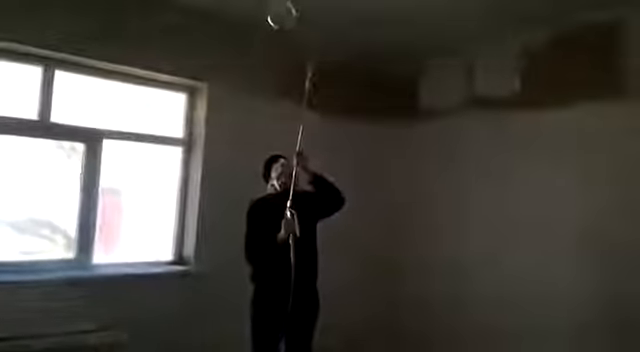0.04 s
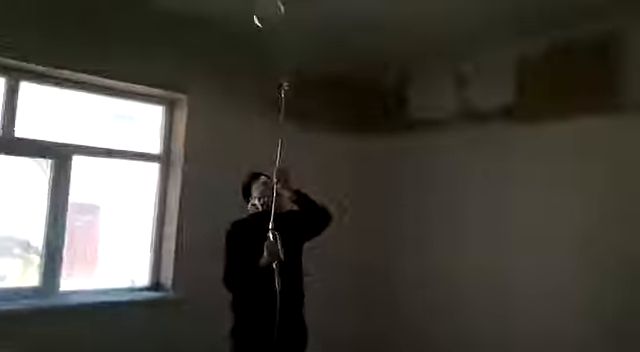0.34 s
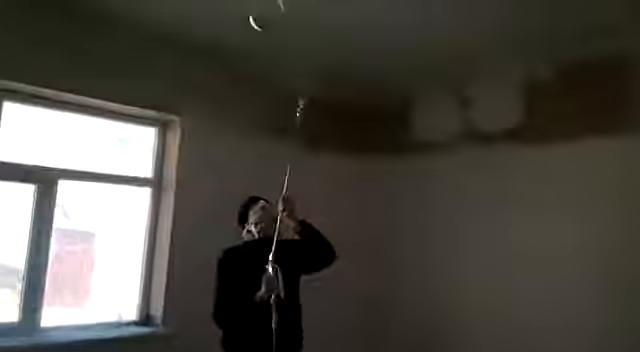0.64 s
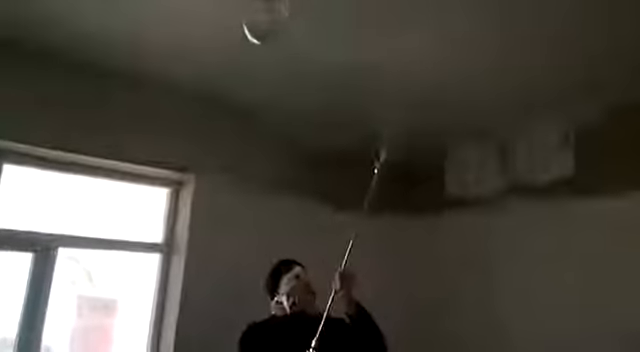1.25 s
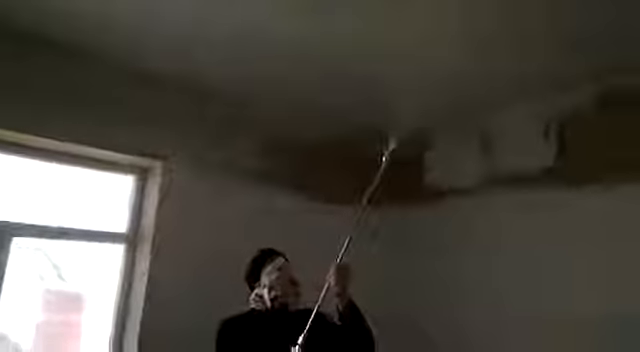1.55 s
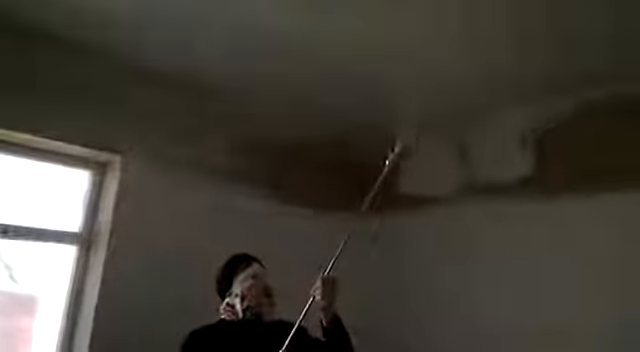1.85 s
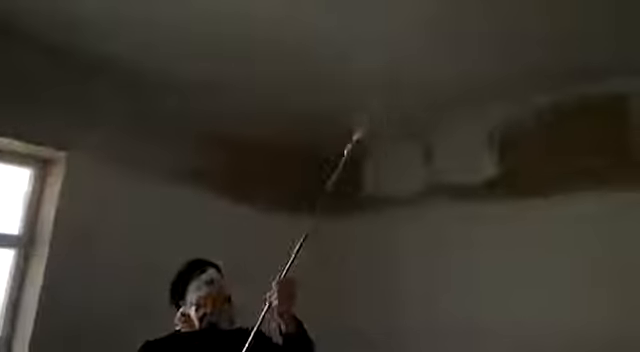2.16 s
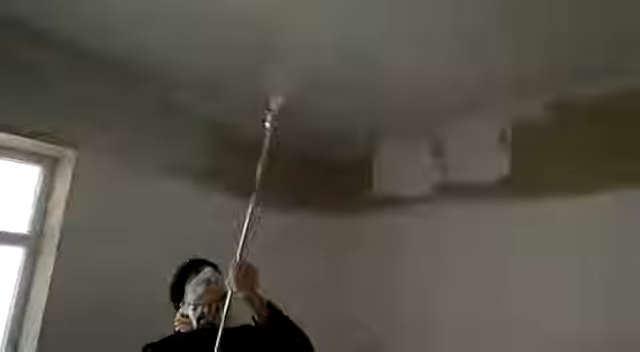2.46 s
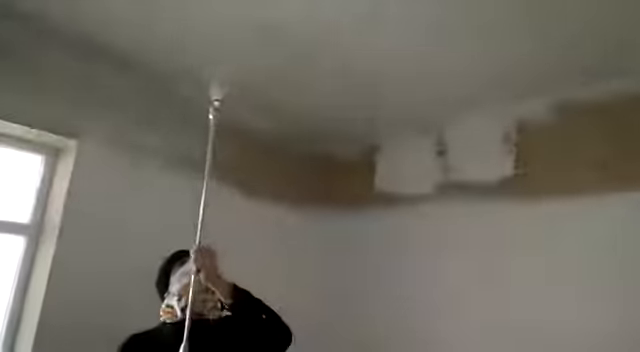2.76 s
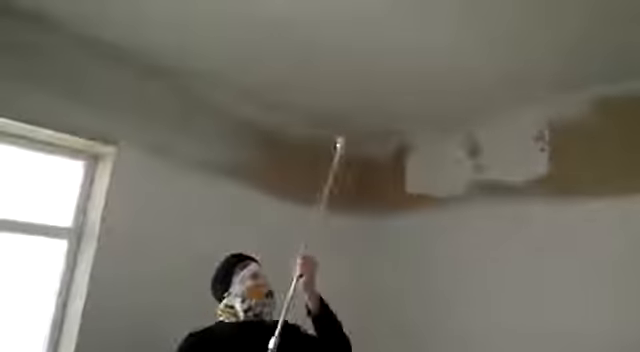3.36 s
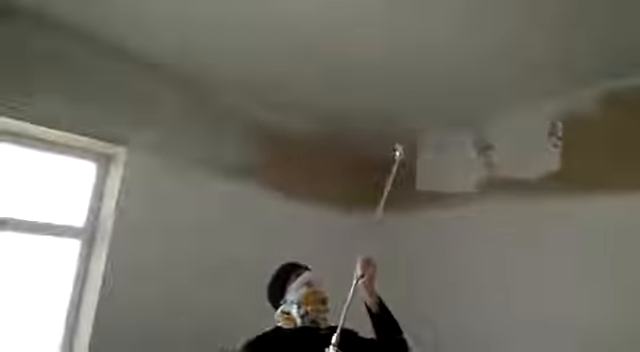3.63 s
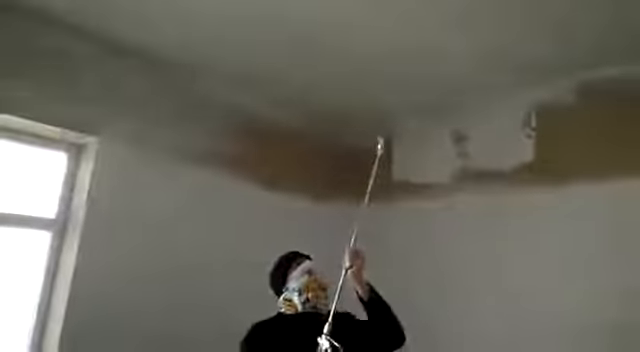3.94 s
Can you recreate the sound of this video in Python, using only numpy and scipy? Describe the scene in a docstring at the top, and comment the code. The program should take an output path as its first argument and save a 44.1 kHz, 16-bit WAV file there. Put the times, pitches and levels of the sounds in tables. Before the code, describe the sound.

Paint sprays onto a ceiling with a dense, grainy hiss, over the wavering whine and regular strokes of a pump. The spray stops, then the pump's whine swells. Low microphone bumps and room hum sit underneath.

```python
"""An airless sprayer coats the ceiling of a bare room: its fan of paint hisses as the wand sweeps,
until the trigger is let go. The pump motor whines and flares throughout, with a knock and a
whirr at each piston stroke, and howls lower and louder once the gun is shut.
Dull bumps and rumbles of handling come and go over the steady hum and air of the room."""
import sys
import numpy as np
from scipy import signal
from scipy.fft import rfft, irfft
from scipy.io import wavfile
from scipy.ndimage import uniform_filter1d

SR = 44100
rng = np.random.default_rng(int(sys.argv[2]) if len(sys.argv) > 2 else 0)


def transcribe(u):
    """Save the signal u as a 16-bit wav file named by the first command-line argument.

    u: samples, shape (n,) or (channels, n), limited to [-1, 1]; the rate is SR.
    q: integer samples, one column per channel.
    """
    v = np.clip(np.atleast_2d(u).T, -1, 1)
    q = np.round(v * 32767).astype(np.int16)
    wavfile.write(sys.argv[1], SR, q)


N = 176400
T = np.arange(N) / SR
HZ = np.fft.rfftfreq(N, 1 / SR)

# Nozzle hiss as the wand sweeps. Each row: time in seconds, relative fizz and jet levels in dB.
NOZZLE_LEVELS = [(0.0, -44.5, -42), (0.17, -39, -44.5), (0.33, -45.5, -47), (0.42, -41, -46),
                 (0.54, -43, -48.5), (0.75, -39.5, -43), (0.94, -43, -49), (1.05, -42.5, -46),
                 (1.17, -45.5, -45.5), (1.24, -42, -44), (1.35, -40.5, -44), (1.55, -46, -50.5),
                 (1.62, -40, -51), (1.74, -45.5, -46.5), (1.9, -41, -44.5), (2.05, -42, -44.5),
                 (2.07, -44, -52), (2.13, -46, -51), (2.28, -42.5, -48.5), (2.38, -43, -47),
                 (2.58, -39, -44.5), (2.76, -45, -52), (2.8, -42.5, -47), (3.08, -39, -45)]
# Rush of paint on the ceiling. Each row: time in seconds, relative level in dB.
SPLASH_LEVELS = [(0.0, -50.5), (0.47, -49.5), (0.51, -46), (0.75, -53), (1.11, -47), (1.15, -53),
                 (1.42, -46.5), (1.47, -48.5), (1.55, -45.5), (1.74, -46.5), (1.76, -52.5), (1.89, -46.5),
                 (2.65, -49.5), (2.66, -54), (2.77, -47), (3.08, -49)]
# Spectra of the spray's three bands. Each row: frequency in Hz, relative density in dB.
FIZZ_SPECTRUM = [(4000, -54.5), (8000, -6.5), (9800, -4.5), (12500, 0), (15000, -4.5)]
JET_SPECTRUM = [(100, -47.5), (1500, -14), (3000, -4.5), (4300, 0), (5300, -5), (6300, -0.5), (8500, -2),
                (10000, 1), (13000, -9.5), (15000, -21)]
SPLASH_SPECTRUM = [(60, -93), (300, -9.5), (550, -29), (1100, -5.5), (1700, 1.5), (2200, 2.5), (3000, 2.5),
                   (4000, -5), (6000, 1), (15000, -41)]
# Stereo balance of the spray. Each row: frequency in Hz, left minus right in dB.
SPRAY_BALANCE = [(300, 5.5), (1300, 2), (2300, 2.4), (4300, 0), (8000, -0.5), (14000, -3)]

def spray(release_s=3.104, shut_db_per_s=254, wet_db=-5):
    """The jet at the nozzle and paint striking the ceiling radiate broadband noise until release."""
    fizz = noise(FIZZ_SPECTRUM, 0.023) * amp(curve(NOZZLE_LEVELS) + 2.5)
    jet = noise(JET_SPECTRUM, 0.023) * amp(curve(NOZZLE_LEVELS, column=2) + 1)
    splash = noise(SPLASH_SPECTRUM, 0.14) * amp(curve(SPLASH_LEVELS) + 2.5)
    hiss = (fizz + jet + splash) * amp(-shut_db_per_s * np.maximum(T - release_s, 0))
    patchy = mottle(hiss + amp(wet_db) * reverberation(hiss)) / np.hypot(1, amp(wet_db))
    side = np.sqrt(spectral_gain(SPRAY_BALANCE))
    return irfft(rfft(patchy) * np.array([side, 1 / side]), N)

def mottle(x, depth_db=5.5):
    """Random modulation: the hiss's colour flickers in small patches, making it grainy."""
    spectra = signal.stft(x, nperseg=1024)[2]
    field = rng.standard_normal(spectra.shape[1:])
    for axis in (0, 1):
        field = uniform_filter1d(field, size=4, axis=axis)
    gain = amp(depth_db * np.minimum(unit(field), 1))
    return signal.istft(spectra * gain, nperseg=1024)[1][:, :N]

def reverberation(x, t60_s=0.66, treble_t60_s=0.1, treble_hz=7760):
    """Diffuse reflections from bare walls decay exponentially, the treble soonest."""
    t = T[:SR]
    white = rng.standard_normal((2, SR))
    low = irfft(rfft(white) / (1 + (np.fft.rfftfreq(SR, 1 / SR) / treble_hz) ** 4), SR)
    tail = low * 1000 ** (-t / t60_s) + (white - low) * 1000 ** (-t / treble_t60_s)
    return signal.fftconvolve(np.atleast_2d(x), tail / np.linalg.norm(tail[0]), axes=1)[:, :N]

# The motor's whine. Each row: time in seconds, relative level in dB, pitch in Hz.
WHINE = [(0, -45, 676.5), (.13, -54.5, 667), (.22, -48.5, 663.7), (.46, -46.5, 676.7), (.62, -49.5, 680),
         (.8, -49.5, 668), (1.1, -45.5, 670), (1.25, -53.5, 671.3), (1.8, -44, 673.3), (2.08, -52.5, 677.4),
         (2.3, -50, 672), (2.58, -48.5, 672.7), (2.7, -54, 681), (2.95, -46.5, 675), (3.25, -49.5, 677.3),
         (3.45, -47.5, 675), (3.6, -46, 658.5), (3.69, -33.5, 647.4), (3.86, -38, 645), (3.93, -51, 639.3),
         (4, -33, 658)]
# Bands just above the whine. Each row: centre in Hz, half width in Hz, base level in dB.
SKIRTS = [(727, 40, -54.5), (814.7, 50, -54)]
# Their swell as the pump labours. Each row: time in seconds, gain in dB.
SKIRT_SWELL = [(0, -0.5), (.5, 0.5), (.8, -3), (1.08, 2.5), (1.3, -2), (2.05, -4), (2.3, 4.5), (2.65, -2),
               (3.2, -2.5), (3.5, 1.5), (4, -3)]
# Upper partials. Each row: pitch ratio, relative level in dB, half width in Hz, left minus right in dB.
PARTIALS = [(1.985, 3, 28.9, 1), (2.11, -1.5, 54, 2), (2.96, -6.5, 40, 2)]
# Envelopes of the partials and of the drive's rasp. Each row: time in seconds, gain in dB.
PARTIAL_LEVELS = [(0, -57), (.7, -58.5), (1.18, -60), (1.3, -51), (1.42, -57.5), (3.2, -58), (3.44, -53.5),
                  (3.52, -54), (3.62, -53), (3.68, -46), (3.8, -47.5), (3.88, -42), (3.92, -54), (4, -48)]
RASP_LEVELS = [(0, -53.5), (3.1, -51), (3.35, -54), (3.58, -53.5), (3.7, -47), (3.87, -45.5), (4, -45.5)]
# Spectrum of the dry rasp. Each row: frequency in Hz, relative density in dB.
RASP_SPECTRUM = [(100, -40), (1200, -9.5), (1450, -10.5), (1600, -6.5), (1750, -4.5), (1900, -8), (2170, 2),
                 (2360, -12), (2500, -12.5), (3000, -19.5), (4000, -32), (5600, -40.5), (12500, -42.5),
                 (14500, -62.5)]

def motor(smear_db=-1, smear_hz=28):
    """Load lowers and strengthens a rasping motor's whine, which reflections smear into a narrow band."""
    pitch = curve(WHINE, column=2)
    whine = amp(curve(WHINE) + smear_db) * narrowband(pitch, smear_hz, 0.45)
    whine += sum(flare(*row) for row in FLARES)
    skirt = sum(amp(db) * narrowband(hz, width, 0.68) for hz, width, db in SKIRTS)
    partials = sum(amp(db) * pan(side_db) * narrowband(ratio * pitch, width, 0)
                   for ratio, db, width, side_db in PARTIALS)
    rasp = amp(curve(RASP_LEVELS)) * pan(2.3) * noise(RASP_SPECTRUM, 0.089)
    return whine + amp(curve(SKIRT_SWELL)) * skirt + amp(curve(PARTIAL_LEVELS)) * partials + rasp

# Flares of the whine. Each row: peak time and length in seconds, level in dB, left minus right in dB.
FLARES = [(0.193, 0.026, -37.5, 0), (0.215, 0.024, -43.5, -6), (0.32, 0.012, -44, -5),
          (0.408, 0.024, -39, -1), (0.688, 0.03, -43, -1), (0.721, 0.024, -44, -5), (0.817, 0.029, -37, -1),
          (0.85, 0.027, -38.5, 1), (0.88, .02, -42.5, 4), (1.045, 0.061, -43, 10), (1.087, 0.029, -42, 11),
          (1.42, 0.031, -44, -10), (2.002, 0.057, -48.5, -1), (2.172, 0.058, -45, 7),
          (2.576, 0.021, -44.5, 11), (3.569, 0.016, -38.5, 4.5), (3.645, 0.028, -36.5, 1.5),
          (3.673, 0.021, -26.5, 6.5), (3.695, 0.014, -30.5, 13), (3.716, 0.021, -35, -3),
          (3.77, 0.019, -26.5, -5), (3.789, 0.0064, -28, -1), (3.813, .012, -35, -2),
          (3.841, 0.023, -23, 6.5), (3.859, 0.011, -28.5, 10), (3.875, 0.017, -25.5, 7),
          (3.906, 0.011, -31, 7), (3.928, .015, -37.5, 11), (3.971, 0.019, -40, 11)]

def flare(peak_s, length_s, db, side_db, ref_hz=661.3, ref_db=-40, sag_hz_per_db=2.0):
    """Reflections give each ear its own phase of a brief clear tone; stronger flares are lower."""
    hz = (ref_hz - sag_hz_per_db * (db - ref_db)) * (1 + 0.004 * rng.standard_normal())
    phase = 2 * np.pi * (hz * T + rng.random()) + 0.44 * rng.standard_normal((2, 1))
    envelope = np.exp(-abs(2 * (T - peak_s) / length_s) ** 3)
    return pan(side_db) * amp(db) * envelope * np.sqrt(2) * np.sin(phase)

# The octave in the howl. Each row: time in seconds, level in dB.
HOWL_LEVELS = [(3.64, -93), (3.68, -47), (3.82, -46), (3.88, -54), (3.92, -55), (4, -54)]

def howl(octave_hz=1275, waver=0.012):
    """Against the shut gun, a firm partial near the second harmonic makes the whine nasal."""
    return amp(curve(HOWL_LEVELS)) * pan(9.8) * tone(octave_hz * (1 + waver * drift(25)))

# Piston strokes. Each row: peak time and length in seconds, knock and whirr levels in dB.
STROKES = [(0.327, 0.14, -62, -47.5), (0.969, .13, -50, -45), (1.656, .11, -60.5, -45.5),
           (2.181, 0.086, -50.5, -46), (2.716, 0.095, -53, -47.5), (3.343, 0.077, -49.5, -49),
           (3.941, 0.12, -43.5, -42.5)]
# Spectrum of the knock. Each row: frequency in Hz, relative density in dB.
KNOCK_SPECTRUM = [(30, -28), (85, -19), (130, -10.5), (170, -2), (220, -2), (270, -1), (320, -13.5),
                  (420, -5.5), (520, -19.5), (700, -24.5), (3000, -54), (15000, -89)]

def piston_strokes(whirr_hz=855.5, width_hz=165, glide_hz_per_s=300):
    """Each stroke is a dull impact, while the unloaded drive whirrs upward in pitch."""
    out = np.zeros((2, N))
    knock = noise(KNOCK_SPECTRUM, 0.93)
    for peak_s, length_s, knock_db, whirr_db in STROKES:
        hz = whirr_hz + glide_hz_per_s * np.clip(T - peak_s, -length_s, length_s)
        whirr = narrowband(hz, width_hz, 0.48)
        out += swell(peak_s, length_s) * (amp(knock_db) * knock + amp(whirr_db) * whirr)
    return out

# Handling bumps. Each row: peak time and length in seconds, boom and rumble gains in dB.
BUMPS = [(0.102, 0.12, -77, -70), (0.686, .12, -75, -78), (0.333, 0.066, -53, -47),
         (0.534, 0.056, -71, -60.5), (1.0, 0.07, -50, -66), (1.115, 0.07, -52, -64),
         (1.184, 0.065, -70, -54), (1.512, 0.036, -54, -59), (1.652, 0.2, -60.5, -67),
         (2.12, 0.033, -57, -62), (2.349, 0.09, -62.5, -65), (2.781, 0.044, -73, -54.5),
         (2.971, 0.12, -62, -58.5), (3.429, 0.15, -60.5, -72.5), (3.54, 0.041, -63.5, -55),
         (3.608, 0.061, -68.5, -39), (3.638, 0.035, -53.5, -38.5), (3.705, 0.038, -64.5, -39.5),
         (3.819, 0.078, -67.5, -43), (3.99, 0.13, -58.5, -43.5)]
# Spectra of boom and rumble. Each row: frequency in Hz, relative density in dB.
BOOM_SPECTRUM = [(20, -16), (38, -16), (54, -9), (72, 2.5), (120, -9), (200, -21), (600, -46), (3000, -68),
                 (15000, -100)]
RUMBLE_SPECTRUM = [(30, -40.5), (85, -4), (125, -1), (148, -3), (175, -2.5), (222, 2.5), (262, 0.5),
                   (305, 1), (400, -9), (470, -9.5), (560, -43.5), (750, -19.5), (3000, -67),
                   (15000, -96.5)]

def handling_bumps(ring_hz=55, ring_db=-4, blur_db=-3):
    """Handling excites a short low resonance and a rumble, nearly the same in both ears."""
    ring = tone(ring_hz * (1 + 0.045 * drift(14)))
    boom = amp(ring_db) * ring + amp(blur_db) * noise(BOOM_SPECTRUM, 0.92)
    rumble = noise(RUMBLE_SPECTRUM, 0.94)
    return sum(swell(peak_s, length_s) * (amp(boom_db) * boom + amp(rumble_db) * rumble)
               for peak_s, length_s, boom_db, rumble_db in BUMPS)

# Hum and air of the room. Each row: frequency in Hz, relative density in dB.
AIR_SPECTRUM = [(20, -23), (55, -1), (90, -2.5), (170, -10.5), (310, 7.5), (550, 8), (1100, 4.5),
                (2200, -15.5), (3000, -9), (4500, -14), (5500, -28), (7000, -20), (12500, -36.5),
                (14000, -50.5)]

def room_air(level_db=-56.5):
    """Stationary noise forms the room's ambient floor."""
    return amp(level_db) * noise(AIR_SPECTRUM, 0.83)

def amp(db):
    """Amplitude grows tenfold every 20 dB."""
    return 10 ** (np.asarray(db) / 20)

def unit(x):
    """Dividing by the RMS gives unit power."""
    return x / np.sqrt(np.mean(abs(x) ** 2) + 1e-20)

def curve(rows, column=1):
    """Linear interpolation of one column in time."""
    rows = np.array(rows)
    return np.interp(T, rows[:, 0], rows[:, column])

def spectral_gain(points):
    """Decibels interpolated over log frequency give a filter's gain."""
    hz, db = np.transpose(points)
    return amp(np.interp(np.log(HZ + 1), np.log(hz), db))

def pair(z, correlation):
    """Mixing two independent signals sets the correlation between the ears."""
    return np.array([z[0], correlation * z[0] + np.sqrt(1 - correlation ** 2) * z[1]])

def noise(spectrum, correlation):
    """Filtering white noise gives coloured stereo noise, here of unit power."""
    white = pair(rng.standard_normal((2, N)), correlation)
    return unit(irfft(rfft(white) * spectral_gain(spectrum), N))

def drift(rate_hz):
    """Low-passed noise wanders at random, with unit power."""
    return unit(irfft(rfft(rng.standard_normal(N)) / (1 + (HZ / rate_hz) ** 4), N))

def tone(hz):
    """A sine of unit power whose phase is the integral of frequency."""
    return np.sqrt(2) * np.sin(2 * np.pi * np.cumsum(hz) / SR)

def narrowband(hz, width_hz, correlation):
    """Random modulation spreads a tone into a band around its pitch."""
    modulation = np.array([drift(width_hz) + 1j * drift(width_hz) for _ in range(2)])
    carrier = np.exp(2j * np.pi * np.cumsum(hz * np.ones(N)) / SR)
    return (pair(modulation, correlation) * carrier).real

def pan(db):
    """A level difference between the ears places a sound; positive is left."""
    return amp(np.array([[db], [-db]]) / 2)

def swell(peak_s, length_s, rise_share=0.49, fall_db=10):
    """A Gaussian rise to the peak, then exponential decay by fall_db per length."""
    age = (T - peak_s) / length_s
    return np.exp(-(np.minimum(age, 0) / rise_share) ** 2) * amp(-fall_db * np.maximum(age, 0))

def scene():
    """Superposition: the pressures of all sources add."""
    return spray() + motor() + howl() + piston_strokes() + handling_bumps() + room_air()

def record(dry, cutoff_hz=15050):
    """A steep low-pass filter limits the bandwidth."""
    lowpass = signal.firwin(701, cutoff_hz, window=("kaiser", 9), fs=SR)
    return signal.oaconvolve(dry, lowpass[None], "same")

dry = scene()
out = record(dry)
transcribe(out)
```